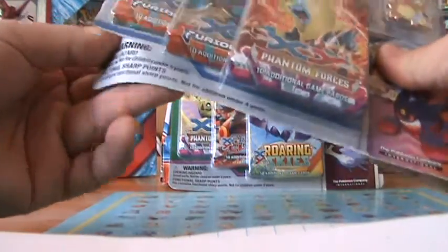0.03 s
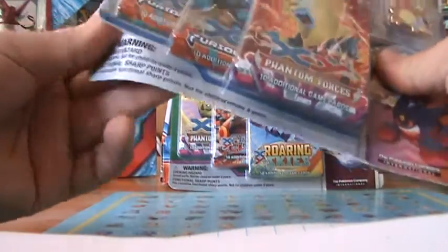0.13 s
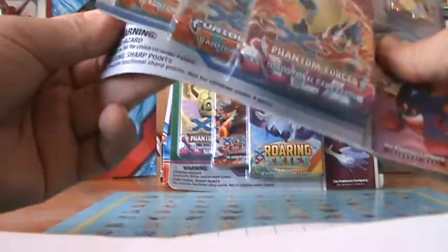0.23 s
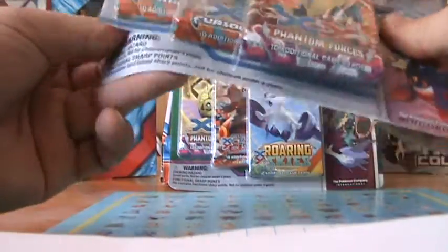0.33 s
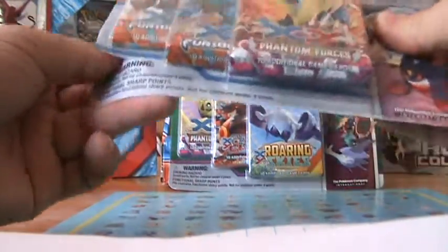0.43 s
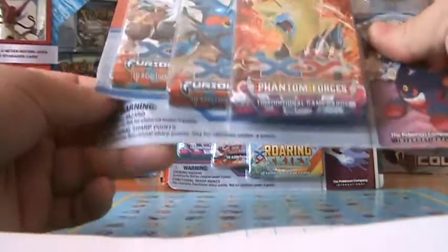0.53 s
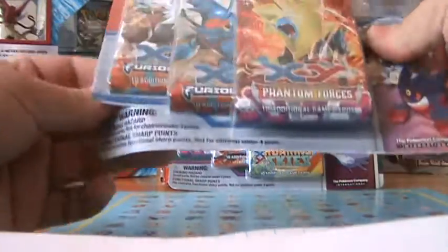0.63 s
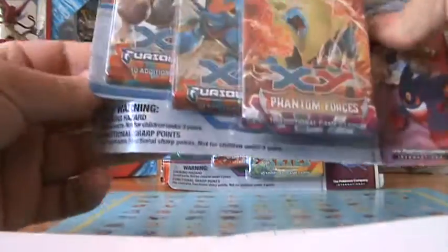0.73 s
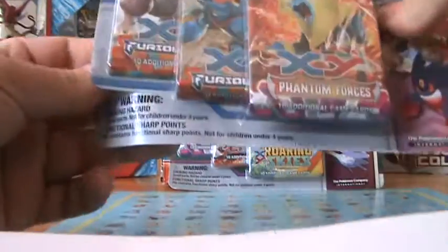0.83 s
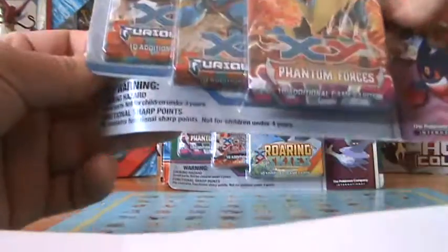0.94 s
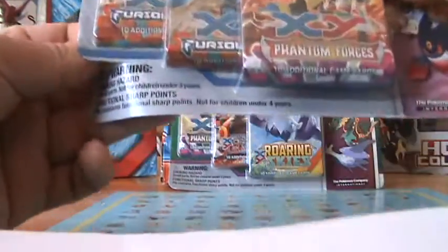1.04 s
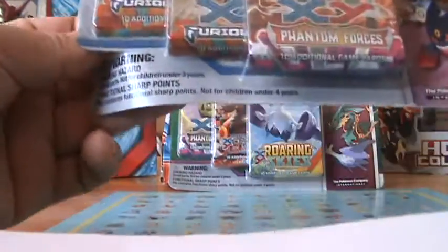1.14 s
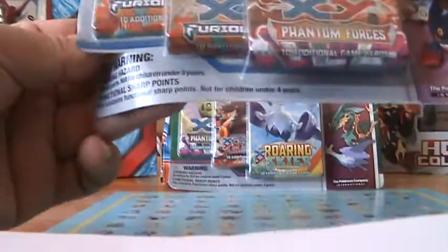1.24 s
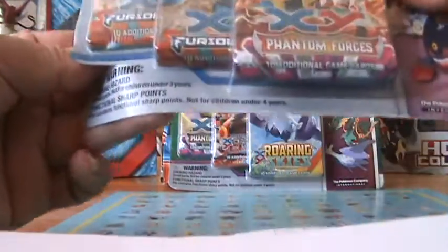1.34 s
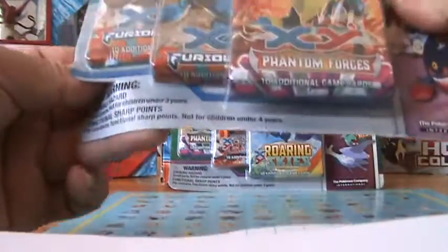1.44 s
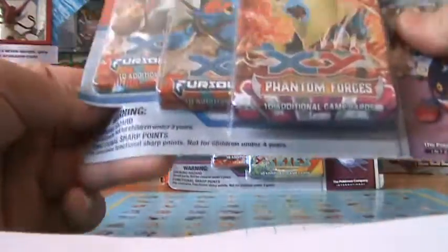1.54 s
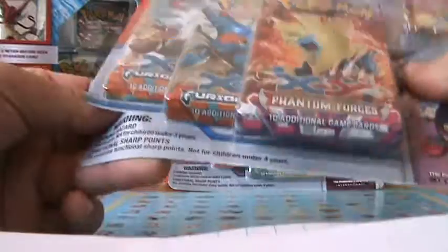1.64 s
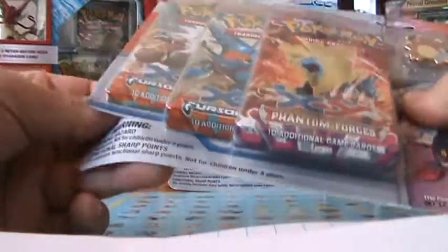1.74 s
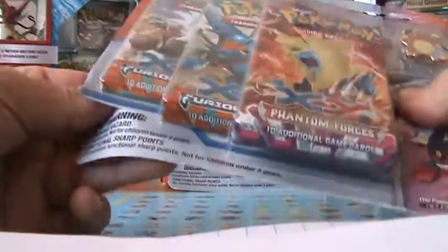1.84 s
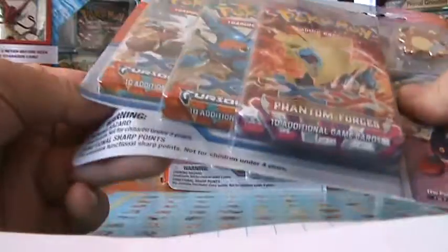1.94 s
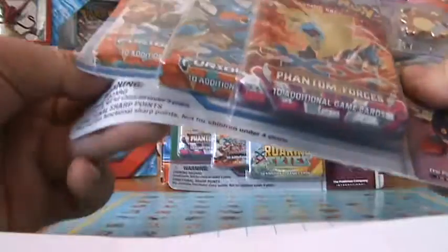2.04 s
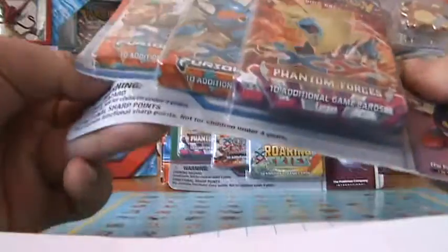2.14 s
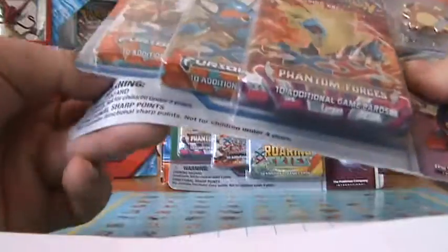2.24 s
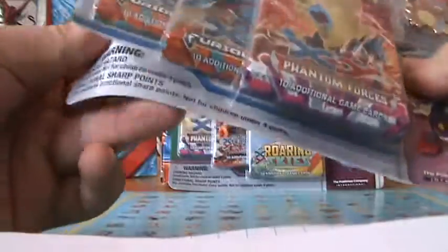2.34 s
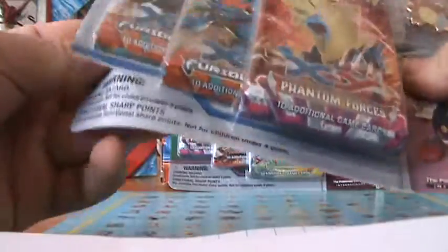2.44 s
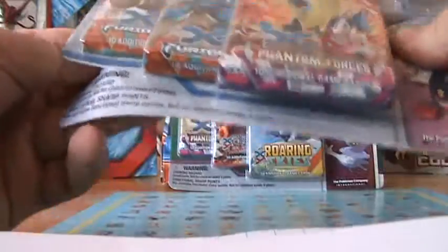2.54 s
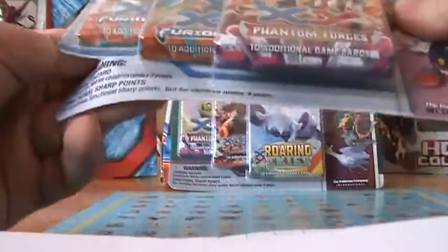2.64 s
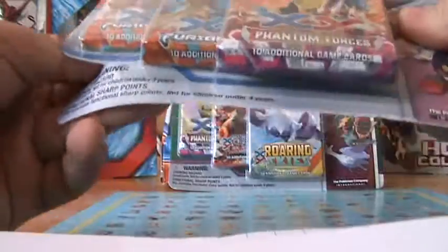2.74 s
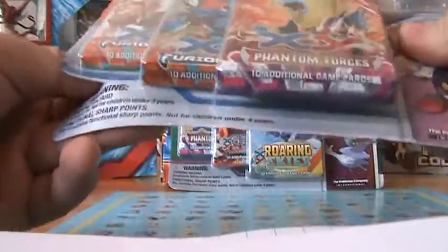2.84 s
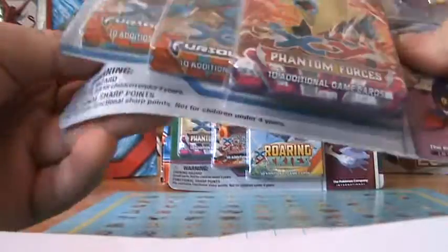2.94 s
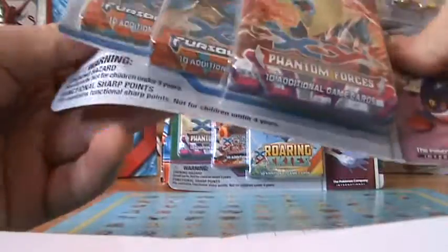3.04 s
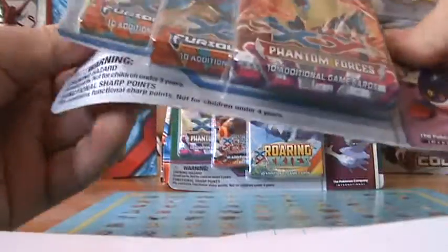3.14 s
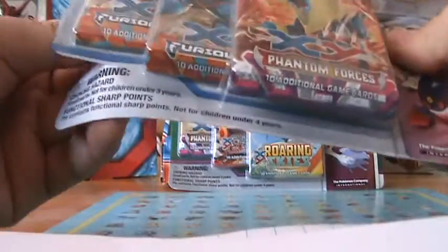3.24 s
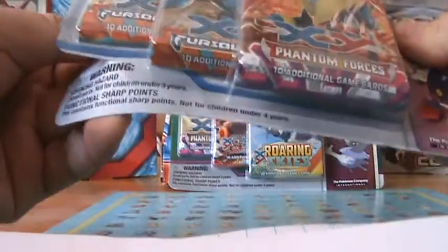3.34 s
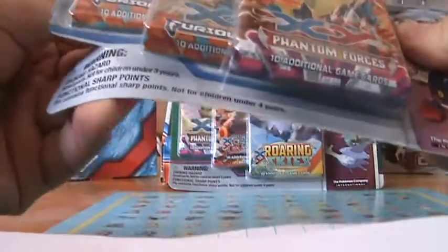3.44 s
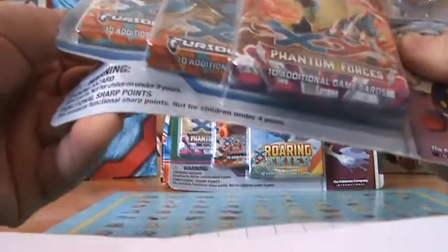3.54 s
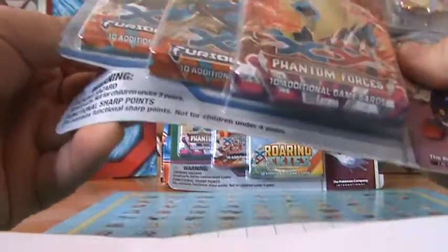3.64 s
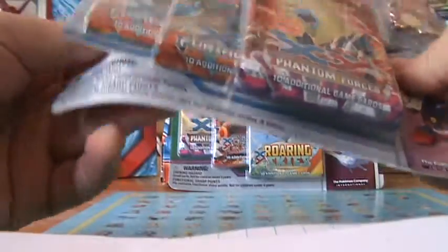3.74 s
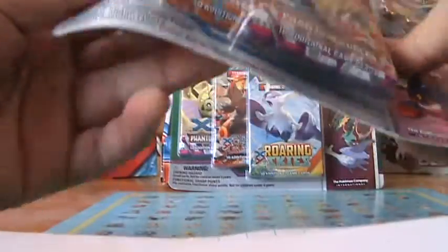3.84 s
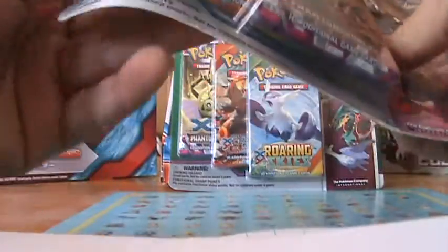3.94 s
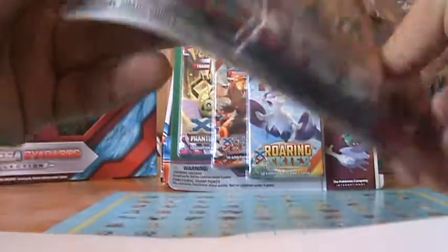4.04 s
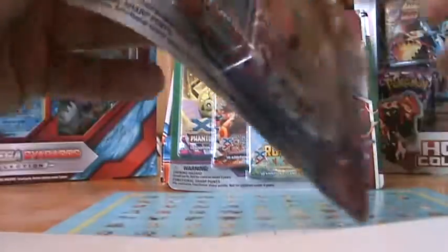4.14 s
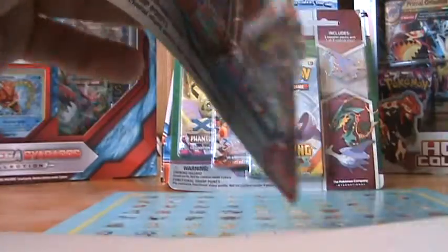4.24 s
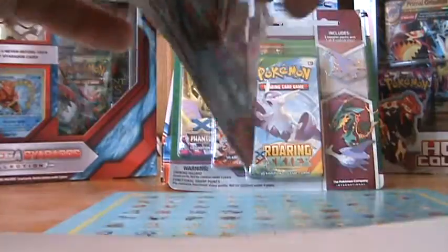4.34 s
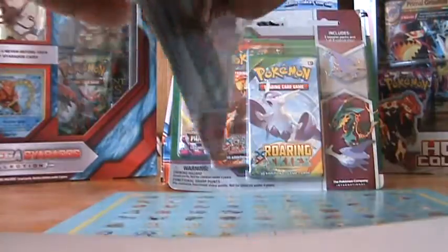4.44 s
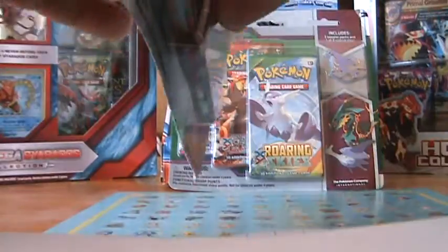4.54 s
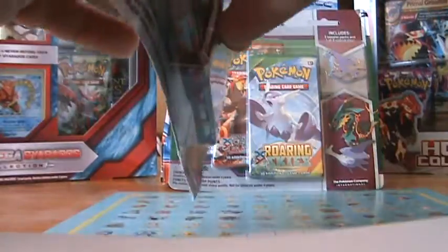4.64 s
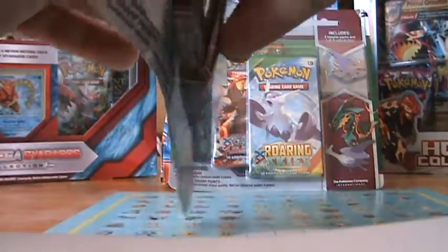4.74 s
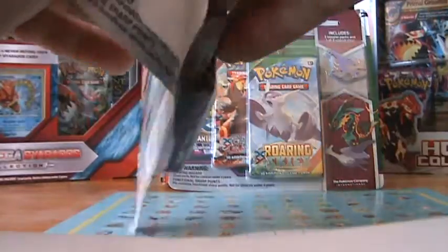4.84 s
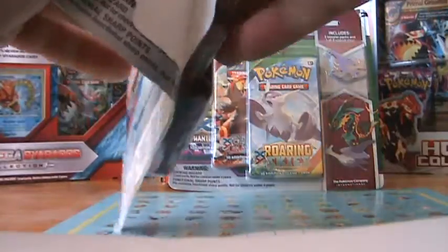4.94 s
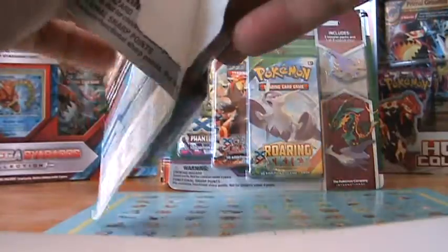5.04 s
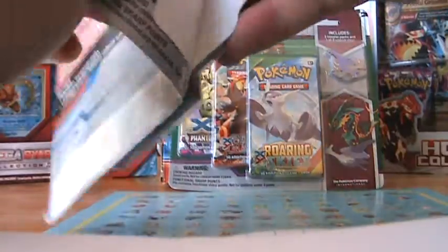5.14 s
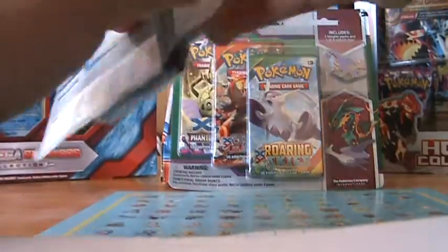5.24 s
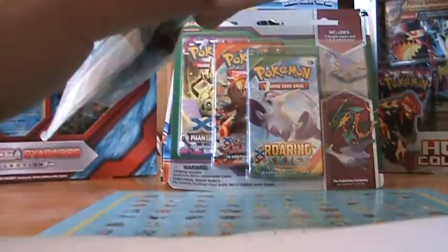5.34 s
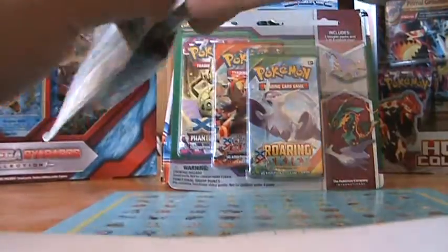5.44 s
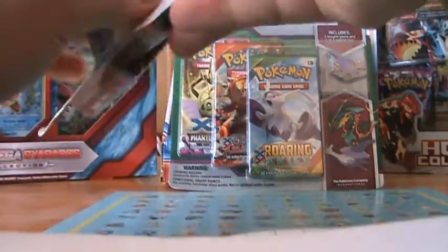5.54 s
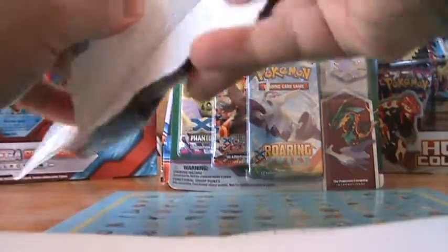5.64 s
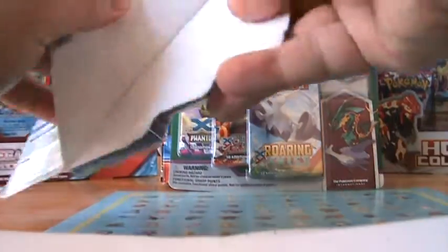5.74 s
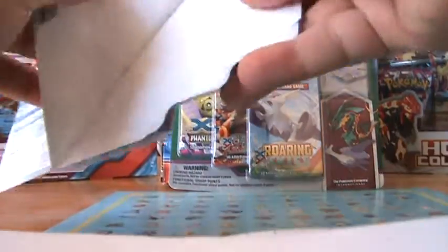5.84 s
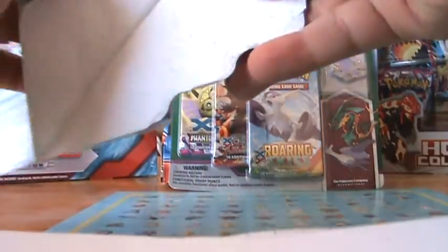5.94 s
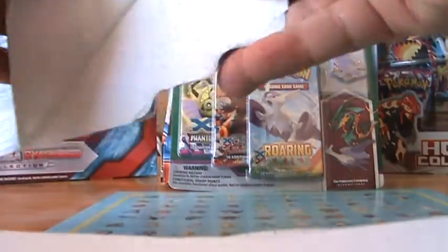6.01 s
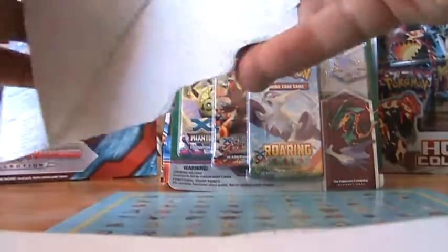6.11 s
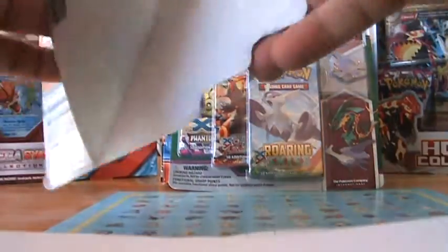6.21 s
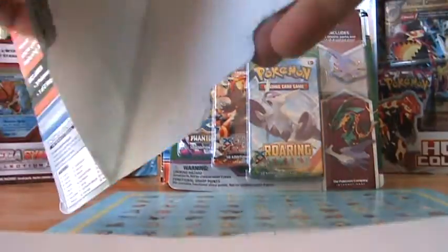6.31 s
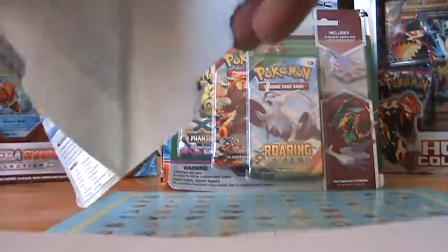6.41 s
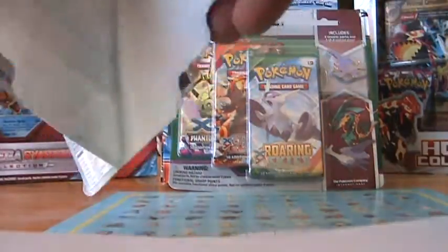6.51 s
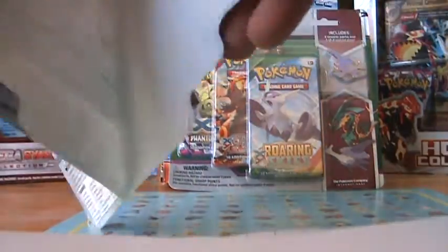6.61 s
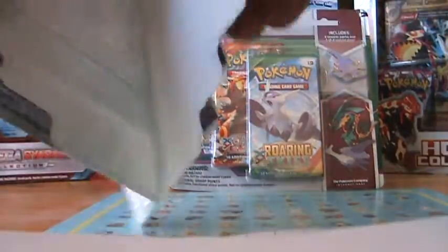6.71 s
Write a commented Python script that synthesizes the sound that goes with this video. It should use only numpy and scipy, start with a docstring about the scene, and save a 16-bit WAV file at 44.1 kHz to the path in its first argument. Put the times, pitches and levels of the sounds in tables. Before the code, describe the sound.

In a small quiet room, close to the microphone, hands work on a stiff plastic pack with card backing. It starts with faint dry crackles, small clicks and dull pops, then sharper creases snap. Past the middle the shell buckles with hollow pops, and rough, bright tearing bursts follow, before it settles into looser crumpling. A faint steady hiss lies underneath.

```python
"""A quiet room, a stereo microphone close by: hands pry a stiff plastic blister pack off its card.
Fibres and glue tear in a dense rustle of random clicks that ring short resonances and the shell's hum.
Dents pop as runs of blows on ringing modes, creases snap as short noise bursts, and hand shifts thump low.
The room answers through feedback delays; a faint hiss of room and microphone stays below."""
import sys
import numpy as np
from scipy import signal
from scipy.fft import rfft, irfft, next_fast_len
from scipy.io import wavfile

SR = 44100
rng = np.random.default_rng(int(sys.argv[2]) if len(sys.argv) > 2 else 0)


def generate_wav(signal):
    """Clip the signal to [-1, 1] and save it as 16-bit WAV at the path in sys.argv[1]."""
    frames = np.transpose(np.atleast_2d(signal))
    scaled = np.clip(frames, -1, 1) * 32767
    pcm = np.round(scaled).astype(np.int16)
    wavfile.write(sys.argv[1], SR, pcm)


N = 298557
STEPS = np.arange(0, N + 64, 64)   # sample positions at which the slow levels are worked out

# steady noise of room and microphone, its colour: hz, relative_db
HISS_COLOUR = [(12, -34), (20, -21), (122, -19), (181, -15), (334, 9.5), (493, 1), (651, 10.5), (885, 3),
               (1020, 9.5), (1380, 4.5), (2350, 2), (2700, 1.5), (6050, -1.5), (9990, -5.5), (15600, -16)]
# each pull on the backing: start_s, rise_s, hold_s, fall_s, crackle_db, crackle_centre_hz,
# spread_below_octaves, spread_above_octaves, card_body_db, card_rumble_db, left_right_db
PULLS = [(0, 0.0033, 0.025, 0.066, -44.5, 6200, 0.65, 0.58, -70, -62, 1.5),
         (0.128, 0.0043, 0.064, 0.091, -52, 4670, 1.2, 0.91, -68, -62, 0),
         (0.264, 0.0044, 0.026, 0.13, -45.5, 4500, 0.6, 0.7, -53, -61, -0.5),
         (0.357, 0.041, 0.07, 0.14, -39.5, 7300, 0.7, 0.44, -48.5, -46, 1),
         (0.588, .05, 0.029, .1, -44, 6250, .9, 0.44, -54.5, -53, 1.2),
         (0.622, .1, 0.047, 0.2, -46.5, 4770, 0.36, 0.56, -46, -50, -2),
         (0.813, 0.056, 0.052, .1, -55.5, 5500, 0.48, 0.5, -57, -59, -1),
         (.995, .004, 0.11, 0.042, -48, 5900, 0.67, .52, -49.5, -52, -2),
         (1.122, 0.0048, 0.066, 0.061, -41.5, 5100, .73, .6, -43.5, -51, -2.1),
         (1.199, 0.051, 0.11, 0.13, -40.5, 5640, 0.43, 0.66, -49.5, -56, .6),
         (1.371, 0.075, 0.12, .13, -31, 5660, 0.9, 0.68, -48.5, -52, 1.2),
         (1.58, 0.076, 0.08, 0.099, -56.5, 5020, 0.68, 0.45, -50.5, -54, 7),
         (1.821, 0.0037, 0.007, 0.063, -40, 5100, 1.2, 0.68, -64, -51, .6),
         (1.918, .08, 0.081, 0.046, -43.5, 5840, 0.58, 0.5, -58, -59.5, 1.5),
         (2.056, 0.045, 0.1, 0.12, -35.5, 4800, 0.83, 0.7, -71, -74, 1),
         (2.296, 0.05, 0.011, 0.13, -40, 5400, 0.66, 0.58, -43.5, -52, 0),
         (2.448, 0.13, 0.11, .1, -35.5, 5700, 0.67, 0.55, -56.5, -58, 1.2),
         (2.616, 0.1, 0.046, 0.076, -30.5, 5500, 0.88, 0.63, -54, -58, 1.5),
         (2.734, .06, .02, .08, -26, 5000, 0.91, 0.72, -47, -55, 3),
         (2.834, 0.051, 0.037, 0.12, -41, 4710, 0.76, 0.86, -52.5, -51.5, 0),
         (2.957, 0.051, 0.069, 0.13, -42.5, 4570, 0.7, .55, -48.5, -51, 0.5),
         (3.11, 0.28, .02, .1, -35, 4700, 0.93, 0.5, -48, -57, -1),
         (3.367, 0.092, 0.055, 0.063, -21, 4210, 0.94, 0.86, -37, -63, 2),
         (3.551, .08, .01, 0.07, -31.5, 5000, 0.73, 0.69, -51, -52, 2),
         (3.759, 0.011, 0.14, .1, -40.5, 4770, 0.81, 0.68, -44.5, -56, 1.6),
         (3.957, 0.044, 0.031, 0.064, -35.5, 5280, 0.65, 0.42, -44, -52, 0.5),
         (4.078, 0.0052, 0.026, 0.078, -31.5, 4040, 1.2, 0.74, -30, -37, -3),
         (4.18, 0.043, 0.13, 0.3, -47, 6800, 0.37, 0.33, -65, -60, 1),
         (4.422, 0.0024, 0.019, 0.041, -44, 4020, 0.53, .8, -48, -46, 2.1),
         (4.457, 0.026, 0.019, 0.047, -42, 4500, .8, .7, -37.5, -45, 2),
         (4.5, .05, 0.203, 0.066, -31.5, 6260, 0.65, 0.49, -44.5, -55.5, -0.2),
         (4.736, 0.073, 0.082, 0.17, -17, 5780, 1.1, 0.65, -32, -53, -0.7),
         (4.967, 0.058, 0.018, 0.063, -18, 5800, 1.17, 0.53, -30, -42, 1),
         (5.116, 0.013, .3, 0.13, -46, 4600, 1.2, 0.74, -50, -57, .6),
         (5.202, 0.046, 0.013, 0.027, -37, 4260, 1.2, 0.97, -52, -59, 1.5),
         (5.393, 0.061, 0.11, 0.088, -45.5, 5100, 1.1, 0.49, -44, -46, 1.2),
         (5.552, 0.045, 0.052, .03, -29.5, 5770, 0.9, .78, -63, -53, 1.2),
         (5.622, 0.034, 0.18, 0.28, -19, 5200, 0.88, 0.76, -23.5, -35.5, 0.2),
         (5.795, 0.041, 0.2, 0.082, -27.5, 5600, 1.2, 0.81, -37, -37.5, 1.7),
         (5.974, 0.032, 0.019, 0.065, -19.5, 5290, 1.16, 0.68, -29, -33, 1.5),
         (6.115, 0.067, 0.084, 0.17, -40.5, 5000, 1.2, 0.87, -45.5, -56, 2),
         (6.256, 0.041, 0.176, 0.027, -39, 4800, 0.88, 0.81, -42.5, -54, 1.5),
         (6.499, 0.082, 0.05, 0.072, -33.5, 5160, 0.6, 0.67, -37, -41, 1.3),
         (6.64, 0.066, .05, .1, -41.5, 5400, 0.77, 0.67, -40, -54, 1.5)]
# colour of the crackle: hz, relative_db
CRACKLE_COLOUR = [(1500, 0), (2300, -0.5), (2900, 0), (3700, 1.5), (4300, 0), (5200, 2.5), (6100, -1),
                  (7000, 4), (8500, 5.5), (10500, 12.5), (12000, 2), (13500, -12), (14500, -12),
                  (15500, -20)]
# colours of the rubbed card, body and rumble: hz, relative_db
BODY_COLOUR = [(250, -87), (450, -16), (750, 3.5), (1200, -1), (1500, -3.5), (1900, 7.5), (2300, -4.5),
               (3200, -2.5), (6000, -51)]
RUMBLE_COLOUR = [(60, -24), (130, -15), (230, -3.5), (350, 1.5), (500, -17.5), (900, -20.5)]
# hands shift on the pack: top_s, thump_db
THUMPS = [(.41, -50), (.64, -57), (.81, -52), (1.15, -52), (1.7, -61), (2.36, -62), (2.81, -50), (3.6, -48),
          (3.69, -51), (4.03, -55), (4.09, -41), (4.34, -62), (4.49, -52), (4.982, -38), (5.48, -39),
          (5.66, -51), (5.92, -54), (6.03, -52), (6.2, -42), (6.331, -43), (6.56, -38), (6.64, -38.5),
          (6.73, -50.5)]
# the shell buckles: start_s, mode_drive_db, dent_pitch_hz, low_push_db, edge_click_drive_db, left_right_db
POPS = [(0.019, -39, 1060, -59, -48, 0.0), (0.134, -40.5, 1090, -50, -26, -0.5),
        (0.274, -31, 2260, -43.5, -39, 0.0), (0.344, -39, 896, -50, -40, -0.5),
        (0.39, -17, 480, -34, -30, 1.5), (0.628, -34, 807, -51, -40, -0.5),
        (0.752, -28, 1730, -49, -37, -4), (0.818, -22.5, 660, -47, -45, 0),
        (0.997, -32, 690, -57, -25.5, -3.0), (1.037, -35, 1370, -55, -30, -2.0),
        (1.129, -17, 686, -30, -25, -1.0), (1.448, -31, 2400, -61, -30, 2),
        (1.829, -26.5, 657, -59, -35, 0.0), (2.112, -26.5, 2780, -67, -23, 2),
        (2.194, -32, 2350, -46, -40, -0.5), (2.326, -34, 2320, -49, -37, -1.0),
        (2.358, -28, 1020, -40.5, -19, -0.5), (2.404, -33, 692, -49, -41, -0.5),
        (2.508, -29, 662, -43, -29, -0.5), (2.545, -32, 694, -47, -36, -2),
        (2.719, -35, 2360, -46, -27, -1), (2.999, -28.5, 1750, -45, -35, 0),
        (3.033, -27, 1750, -40, -20, 0.5), (3.334, -31.5, 685, -49, -36, 0.5),
        (3.56, -22, 1420, -42, -17, -0.5), (3.594, -24, 2264, -41.5, -31, 1.0),
        (3.686, -24.5, 950, -49, -22, -0.5), (3.729, -24.5, 643, -42, -20, -0.5),
        (3.792, -23.5, 888, -36, -15, 0.0), (3.986, -34, 972, -53, -35, 0.0),
        (4.087, -10.5, 950, -21.5, -29, -1.5), (4.105, -15.5, 1960, -34, -17, 4),
        (4.121, -21, 713, -41, -31, 8), (4.149, -17.5, 1190, -33, -38, -1.5),
        (4.229, -27, 1000, -49, -58, 9), (4.303, -21, 1020, -55, -31, 2),
        (4.315, -18.5, 1190, -40.5, -41, -2), (4.432, -13, 1220, -38, -21.5, 3),
        (4.439, -5.5, 1200, -36, -14.5, -2), (4.485, -30, 1160, -36, -35, -5),
        (4.523, -11.5, 1400, -36.5, -30, 2), (4.625, -16.5, 1210, -43, -24, 1),
        (4.905, -13.5, 780, -47, -19, 2), (4.953, -15, 1270, -35, -23, 1), (4.973, -7.5, 775, -31, -7, 1.5),
        (5.109, -30, 1300, -48, -44, 5), (5.122, -22.5, 1250, -42, -41, 1.0),
        (5.141, -15, 764, -38, -35, 1), (5.177, -22.5, 726, -35.5, -41, 2),
        (5.247, -20.5, 1920, -56, -31, 2), (5.326, -13.5, 1150, -41, -37, 1.5),
        (5.375, -22.5, 1800, -41, -36, 0.5), (5.473, -24, 705, -38, -20, -2),
        (5.499, -22.5, 662, -35, -45, 0.5), (5.522, -18, 1190, -40, -21, 1.5),
        (5.585, -27, 1220, -47, -26, 3), (5.644, -10.5, 2610, -44, -9, 2),
        (5.676, -27, 1850, -36, -26, -11), (5.764, -16, 1220, -33, -18, 2),
        (6.011, -11, 1880, -28, -31, -1), (6.075, -15.5, 1170, -33, -38, 2),
        (6.133, -29, 1070, -39, -46, 7), (6.201, -21.5, 1806, -33.5, -30, -1),
        (6.32, -23, 1670, -29, -18, 0.5), (6.368, -18.5, 1710, -40, -32, 0),
        (6.388, -24, 1360, -54, -37, 0.5), (6.415, -30, 1750, -47, -37, 0.0),
        (6.425, -23, 1160, -47, -26, -1), (6.456, -16, 1940, -45, -26, 1.5),
        (6.467, -14.5, 1110, -48, -26, 0), (6.585, -17, 1220, -40, -37, -1),
        (6.612, -15.5, 730, -38, -30, 0), (6.635, -19, 2040, -34, -35, 4),
        (6.664, -17.5, 1830, -39, -26, 2), (6.696, -20, 1150, -34.5, -24.5, 1.5)]
# modes of the plastic shell: hz, relative_db, t60_s
SHELL_MODES = [(613, 0.5, 0.033), (741, 6, 0.018), (990, 5.5, 0.015), (1215, 8.5, 0.017),
               (1402, 5.5, 0.016), (1620, 9.5, 0.0089), (1829, 5, 0.013), (2474, 9, 0.0054),
               (3060, 2, 0.026), (3900, 10, 0.0056), (476, -8, 0.036)]
# modes of the card as a whole: hz, relative_db, t60_s
CARD_MODES = [(92, -14, 0.02), (146, -8.5, 0.1), (248, -8, 0.068), (303, -3, 0.057), (384, -0.5, 0.056)]
# creases snap: start_s, body_peak_db, pitch_hz, left_right_db
TICKS = [(0.1345, -40, 2960, 4), (0.2738, -29, 4360, 3), (0.3197, -32, 10400, 1.0),
         (0.3433, -26.5, 10200, 1.0), (0.3945, -22, 7430, 5), (0.4303, -25, 7200, 3),
         (0.6325, -36, 6780, 1.0), (0.7552, -31, 3940, -7), (0.8417, -29.5, 6160, -5.5),
         (0.9998, -22.5, 6930, -8), (1.0392, -23.5, 5030, -7), (1.074, -26, 5650, -5),
         (1.1288, -15.5, 5600, -4), (1.153, -24, 5570, -8), (1.189, -26, 3350, -9),
         (1.2424, -34, 5280, -0.5), (1.2511, -11.5, 5200, 3), (1.306, -22, 5070, 4),
         (1.3174, -29, 5500, 2.5), (1.3534, -26, 5200, 4), (1.4157, -21, 4900, 1), (1.4294, -18, 7630, 4),
         (1.443, -19, 5150, 2.5), (1.508, -15.5, 5100, 4), (1.5996, -20, 5160, 3.0), (1.8274, -37, 4020, 4),
         (1.9684, -32, 5100, 2.5), (2.0058, -31, 5580, 2.0), (2.0604, -26, 6580, 2.5),
         (2.1076, -18.5, 4560, 4), (2.2398, -22.5, 6560, 2.5), (2.3261, -26, 5370, 3),
         (2.356, -17.5, 5370, 5), (2.485, -25, 5230, 2.5), (2.4912, -21.5, 4730, 4), (2.5436, -17, 5360, 3),
         (2.7132, -21, 4890, 2.0), (2.8834, -23.5, 4570, 4), (2.916, -22.5, 4500, 4),
         (3.0014, -30, 5440, 7), (3.0144, -23, 4210, 4), (3.034, -22, 5490, 5), (3.3084, -24, 5050, 10),
         (3.3654, -21, 4400, 3.0), (3.4023, -18, 5300, 5), (3.4253, -11, 5370, 5), (3.4557, -2, 4030, 4),
         (3.5604, -25, 4650, 1.0), (3.601, -15.5, 5260, 4), (3.687, -27, 5830, 0.5), (3.7907, -25, 3920, 9),
         (3.994, -27, 4760, 4), (4.0233, -13.5, 5930, 4), (4.0862, -15, 4300, -1.0),
         (4.1078, -12.5, 2930, -1.0), (4.15, -33, 3900, 4), (4.1966, -26, 6660, 2.5),
         (4.2125, -26, 6650, 2.0), (4.2373, -33, 6470, 2.5), (4.2662, -20, 7300, 2.0),
         (4.278, -17, 7000, 2.5), (4.3035, -20.5, 4480, 0), (4.3246, -26, 6000, 2.0),
         (4.3905, -25.5, 6860, 1.5), (4.4402, -13, 4000, 2), (4.4837, -23, 5150, -1),
         (4.4964, -24, 5190, 0.0), (4.5386, -13.5, 5930, 1.5), (4.5625, -21, 5720, -1),
         (4.6272, -8.5, 6650, -3), (4.671, -6.5, 6820, 0), (4.767, -13, 6100, 1.5), (4.7836, -4, 6240, 1.5),
         (5.0235, -5, 5960, -6), (5.1357, -21, 3100, 2), (5.244, -30, 2950, 1.0), (5.38, -23, 6600, 1.0),
         (5.465, -21, 5560, 0.5), (5.4846, -20.5, 5660, -2), (5.5288, -21.5, 5650, 1.5),
         (5.6037, -25, 4380, -2), (5.6201, -12.5, 8240, 5), (5.6744, -15, 4640, 0.5),
         (6.0062, -25, 3300, 3), (6.2013, -25.5, 3130, 1.5), (6.316, -20.5, 3140, 1.5),
         (6.368, -23, 6020, -1), (6.4339, -17.5, 6140, 2.0), (6.549, -21, 4230, 2.5),
         (6.7013, -28, 5760, 2.0)]
# colour of the room's answer: hz, relative_db
ECHO_COLOUR = [(30, -9), (80, 7), (300, -9), (600, -1), (1200, -10.5), (2400, -8.5), (5000, 1),
               (12000, 1.5)]

HISS_DB, GRIP_DB = -52, -61   # steady levels: the hiss, the low noise of the grip
SWELL_DB = 25   # a pull or thump climbs this far during its rise and sinks this far during its fall
THUMP_RISE_S, THUMP_FALL_S = 0.085, 0.062
# after a dent the card rustles on: crackle re edge click, body re mode drive, rumble re low push
WAKE_T60_S, WAKE_DB = 0.11, (-17.5, -16.5, -1)
CRUNCH_S = 0.0035   # mean delay of a dent's later blows
CRACK_DB = -16   # bright crack of a crease, re the peak of its body
TICK_SAMPLES = 900
ROOM_T60_S, WALL_CUT_HZ = 0.15, 9600
CUTOFF_HZ = 15650


def from_db(db):
    """Decibels to gain."""
    return 10 ** (np.asarray(db) / 20)


def rms_one(x):
    """Scale to unit rms."""
    return x / np.sqrt(np.mean(x ** 2) + 1e-20)


def at_hz(points, hz):
    """Read a colour in dB on a log-frequency axis."""
    points = np.array(points)
    return np.interp(np.log(hz), np.log(points[:, 0]), points[:, 1])


def filtered(x, order, cut_hz, kind):
    """Butterworth filter."""
    return signal.sosfilt(signal.butter(order, cut_hz, kind, fs=SR, output="sos"), x)


def sides(left_right_db):
    """Level offsets in dB of left and right, half the difference each."""
    return left_right_db * np.array([[.5], [-.5]])


def per_sample(x):
    """From steps to samples."""
    return np.interp(np.arange(N), STEPS, x)


def drift(rate_hz):
    """Slow chance: noise at every 20th sample through a double one-pole low-pass, at unit rms."""
    r = np.exp(-40 * np.pi * rate_hz / SR)
    noise = rng.standard_normal(N // 20 + 2002)
    slow = signal.lfilter([1], [1, -2 * r, r * r], noise)[2000:]   # skip the run-in
    return np.interp(np.arange(N) / 20, np.arange(len(slow)), rms_one(slow))


def ring(x, hz, t60_s):
    """A two-pole resonance: a unit click sets a sine of height 1 ringing."""
    r = from_db(-60 / (t60_s * SR))
    w = 2 * np.pi * hz / SR
    return signal.lfilter([0, np.sin(w)], [1, -2 * r * np.cos(w), r * r], x + 1e-18)


def clicks(times_s, left_right_db, level_db):
    """Stereo click train with one click for each event."""
    out = np.zeros((2, N))
    at = np.clip((times_s * SR).astype(int), 0, N - 1)
    np.add.at(out.T, at, from_db(level_db + sides(left_right_db)).T)
    return out


def breaks(per_s, uneven_db):
    """Fibres part: random clicks of uneven size and sign."""
    present = rng.random(N) < per_s / SR
    size = from_db(uneven_db * np.minimum(rng.exponential(1, N), 3))
    return present * size * rng.choice([-1, 1], N)


def swells(full_s, ease_s, rise_s, fall_s):
    """Power of each event at every step, re its top: a straight climb in dB, a hold, a straight fall."""
    t = STEPS / SR
    rise_s, fall_s = np.maximum(rise_s, .002), np.maximum(fall_s, .002)
    before = (full_s[:, None] - t) / np.c_[rise_s]
    after = (t - ease_s[:, None]) / np.c_[fall_s]
    away = np.maximum(0, np.maximum(before, after))
    return from_db(-2 * np.minimum(SWELL_DB * away, 150))


def summed(power, level_db):
    """Events add in power; the result in dB."""
    return 10 * np.log10(from_db(2 * level_db) @ power + 1e-12)


def hiss(alike):
    """Steady room and microphone noise, partly shared by both sides."""
    hz = np.fft.rfftfreq(N, 1 / SR)
    colour = from_db(at_hz(HISS_COLOUR, hz + 1))
    mid, side = irfft(rfft(rng.standard_normal((2, N))) * colour, N)
    stereo = np.sqrt(1 + alike) * mid + np.sqrt(1 - alike) * side * [[1], [-1]]
    return from_db(HISS_DB) * rms_one(stereo)


def effort():
    """Pulls, dents and hand shifts set crackle, body, rumble and thump levels, crackle colour and side."""
    start, rise, hold, fall, crackle, centre, below, above, body, rumble, pan = np.transpose(PULLS)
    pulls = swells(start + rise, start + rise + hold, rise, fall)
    dent_s, drive, _, push, edge, _ = np.transpose(POPS)
    wakes = swells(dent_s, dent_s, 0, WAKE_T60_S * SWELL_DB / 60)
    both = np.vstack([pulls, wakes])
    levels = [summed(both, np.r_[pull, dent + wake])
              for pull, dent, wake in zip((crackle, body, rumble), (edge, drive, push), WAKE_DB)]
    # colour and side follow whichever pull crackles most at the moment
    share = pulls * from_db(2 * crackle)[:, None] + 1e-30
    share = share / share.sum(0)
    thump_s, thump = np.transpose(THUMPS)
    thumps = swells(thump_s, thump_s, THUMP_RISE_S, THUMP_FALL_S)
    grip = np.ones(len(STEPS))
    thump_db = summed(np.vstack([thumps, grip]), np.r_[thump, GRIP_DB])
    return *levels, thump_db, *(np.array([centre, below, above, pan]) @ share)


def resonance_gains(hz, levels_db, centre_hz, below, above):
    """Crackle, body and rumble share one bank of resonances and add in power."""
    octaves = np.log2(hz / centre_hz)
    spread = np.clip(np.where(octaves < 0, below, above), .25, 3)
    crackle = at_hz(CRACKLE_COLOUR, hz) - 6 * (octaves / spread) ** 2
    body = np.broadcast_to(at_hz(BODY_COLOUR, hz), octaves.shape)
    rumble = np.broadcast_to(at_hz(RUMBLE_COLOUR, hz), octaves.shape)
    shapes = from_db([crackle, body, rumble]) ** 2
    levels = from_db(levels_db)[:, None] ** 2
    return np.sqrt((levels * shapes / shapes.sum(1, keepdims=True)).sum(0))


def fibres(force, hz, gains, scatter_db, cycles):
    """Each break rings a bank of short resonances, with its own strength in each; returns middle and side."""
    strength = from_db(scatter_db * rng.standard_normal(N)) * rng.choice([-1, 1], N)
    middle, aside = np.zeros(N), np.zeros(N)
    for k, pitch_hz in enumerate(hz):
        tone = ring(force * np.roll(strength, 1009 * k), pitch_hz, cycles / pitch_hz)
        tone = rms_one(np.diff(tone, prepend=0))
        tone = per_sample(gains[k]) * from_db(0.91 * drift(14.6)) * tone   # the colour keeps shifting
        middle += tone
        aside += from_db(-29.0) * rng.standard_normal() * tone   # each resonance sits at its own place
    return middle, aside


def shell_hum(force, body_db):
    """The rubbing keeps the shell's first eight modes humming, each coming and going."""
    out = np.zeros(N)
    for hz, db, t60_s in SHELL_MODES[:8]:
        level_db = per_sample(body_db) + db - 23.0 + 5.14 * drift(8.5)
        out += from_db(level_db) * rms_one(ring(force, hz, 2.02 * t60_s))
    return out


def hand_thumps(rustle, thump_db):
    """Hands shift on the pack: the lowest band of the rustle, swelled with each shift over a steady grip."""
    return from_db(per_sample(thump_db)) * rms_one(filtered(rustle, 2, [22, 110], "band"))


def tearing(snap_db, clump_db, scatter_db, cycles):
    """A dense rustle of breaking fibres with sparser snaps on top drives the card and the shell."""
    crackle_db, body_db, rumble_db, thump_db, centre_hz, below, above, pan_db = effort()
    hz = np.geomspace(70, 15000, 40)
    gains = resonance_gains(hz[:, None], [crackle_db, body_db, rumble_db], centre_hz, below, above)
    rustle = rms_one(breaks(per_s=9000.0, uneven_db=2.5)) * from_db(clump_db * drift(150))
    # the harder the tear, the more its snaps drown in the rustle
    share_db = snap_db - 0.55 * (per_sample(crackle_db) + 44)
    snaps = from_db(share_db) * rms_one(breaks(per_s=300.0, uneven_db=3.5))
    ragged = from_db(1.27 * drift(26.5))   # the tear catches and slips
    force = ragged * (rustle + snaps) / np.sqrt(1 + from_db(2 * share_db))
    middle, aside = fibres(force, hz, gains, scatter_db, cycles)
    middle = filtered(middle + shell_hum(force, body_db), 3, 140, "high")
    middle += hand_thumps(rustle, thump_db)
    stereo = middle + filtered(aside, 2, 120, "high") * [[1], [-1]]
    return stereo * from_db(sides(per_sample(pan_db)))


def pops(reach_octaves, scatter_db, after_db, count):
    """A dent snaps over in a first blow and a ragged, fading run; shell modes near its pitch ring most."""
    start_s, drive_db, dent_hz, push_db, edge_db, pan_db = np.transpose(POPS)
    modes = SHELL_MODES + CARD_MODES
    chance = rng.standard_normal((len(start_s), count, len(modes)))
    late = rng.exponential(1, (len(start_s), count))
    late[:, 0] = 0
    chance[:, 0] *= .3   # the first blow is the cleanest
    times_s = (start_s[:, None] + late * CRUNCH_S).ravel()
    fade_db = np.where(late > 0, after_db - 3.65 * late, 0)
    blow_pan_db = np.repeat(pan_db, count)
    out = np.zeros((2, N))
    for k, (hz, db, t60_s) in enumerate(modes):
        if k < len(SHELL_MODES):
            near_db = drive_db - 11.0 - 6 * (np.log2(hz / dent_hz) / reach_octaves) ** 2
        else:
            near_db = push_db   # the card is pushed whatever the pitch of the dent
        level_db = near_db[:, None] + db + fade_db + scatter_db * chance[:, :, k]
        out += (-1) ** k * ring(clicks(times_s, blow_pan_db, level_db.ravel()), hz, t60_s)
    # the bare contact of the first blow: a click too short to have a pitch
    contact = ring(clicks(start_s, pan_db, edge_db + 2.0), 3140, 0.0013)
    out += np.diff(contact, prepend=0)
    return filtered(out, 2, 70, "high")


def ticks(t60_s, width, tail_t60_s, tail_db):
    """A crease snaps: a click and noise fading at two rates, through a resonance at its pitch and a bright band."""
    out = np.zeros((2, N + TICK_SAMPLES))
    t = np.arange(TICK_SAMPLES) / SR
    noise = rng.standard_normal((len(TICKS), TICK_SAMPLES))
    noise[:, 0] = 15.5   # the click that opens each snap
    bursts = noise * (from_db(-60 * t / t60_s) + from_db(tail_db - 60 * t / tail_t60_s))
    cracks = filtered(bursts, 3, [7500, 12000], "band")
    for (start_s, peak_db, hz, pan_db), burst, crack in zip(TICKS, bursts, cracks):
        body = signal.lfilter(*signal.butter(1, [hz / width, hz * width], "band", fs=SR), burst)
        snap = body / np.abs(body).max() + from_db(CRACK_DB) * crack / np.abs(crack).max()
        at = int(start_s * SR)
        out[:, at:at + TICK_SAMPLES] += from_db(peak_db + sides(pan_db)) * snap
    return out[:, :N]


def room(x):
    """Six feedback delays a side, from the table top to the walls, duller on every round."""
    size = next_fast_len(N + SR)
    hz = np.fft.rfftfreq(size, 1 / SR)
    dull = 1 / (1 + 1j * hz / WALL_CUT_HZ)
    spectrum = rfft(x, size) * from_db(at_hz(ECHO_COLOUR, hz + 1))
    out = []
    for lags_s in rng.uniform(0.0014, .022, (2, 6)):
        answer = 0
        for k, lag_s in enumerate(lags_s):
            loop = from_db(-60 * lag_s / ROOM_T60_S) * dull * np.exp(-2j * np.pi * hz * lag_s)
            answer = answer + (-1) ** k * loop / (1 - loop)   # all rounds of the delay at once
        out.append(irfft(spectrum * answer, size)[:N])
    return np.array(out)


def scene():
    """The pack close by, its echo in the room, and the hiss."""
    pack = tearing(snap_db=-2.0, clump_db=1.14, scatter_db=4.0, cycles=16.2)
    pack = pack + pops(reach_octaves=0.59, scatter_db=4.5, after_db=-9.0, count=5)
    pack = pack + ticks(t60_s=0.0066, width=1.09, tail_t60_s=0.034, tail_db=16.0)
    return pack + from_db(-17.5) * room(pack.mean(0)) + hiss(alike=0.56)


def record(dry):
    """The microphone dulls the very top, peaks are rounded, the top is cut steeply."""
    dulled = filtered(dry, 2, 15000, "low")
    rounded = .55 * np.tanh(dulled / .55)
    return signal.sosfilt(signal.ellip(12, 1, 65, CUTOFF_HZ, fs=SR, output="sos"), rounded)


dry = scene()
out = record(dry)
generate_wav(out)
```